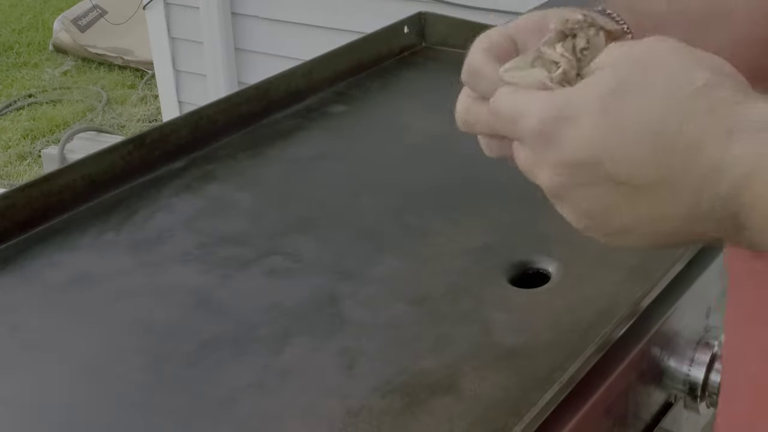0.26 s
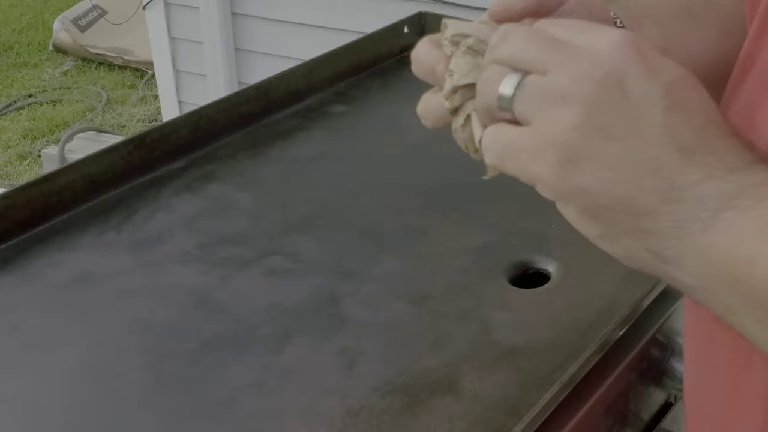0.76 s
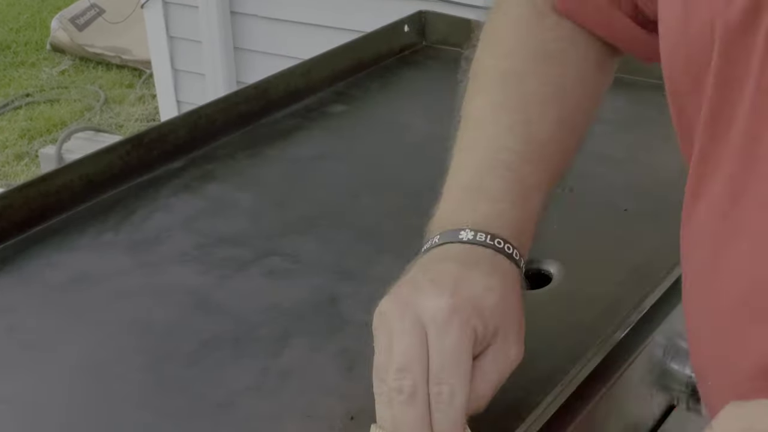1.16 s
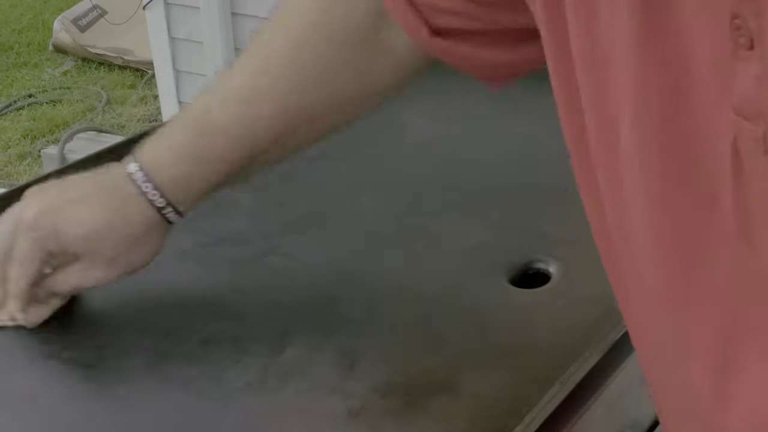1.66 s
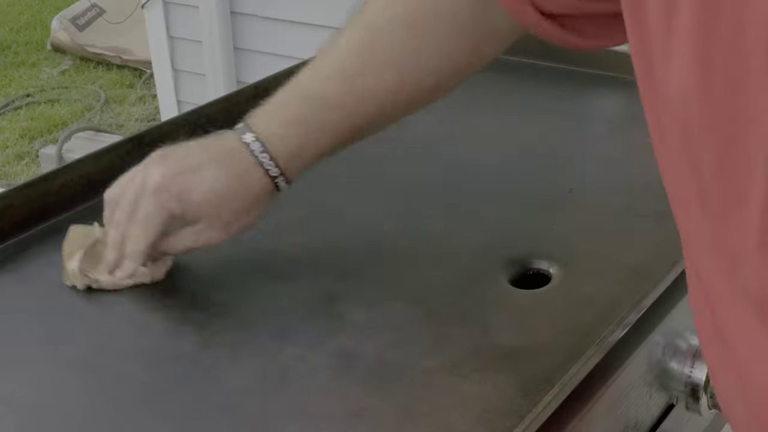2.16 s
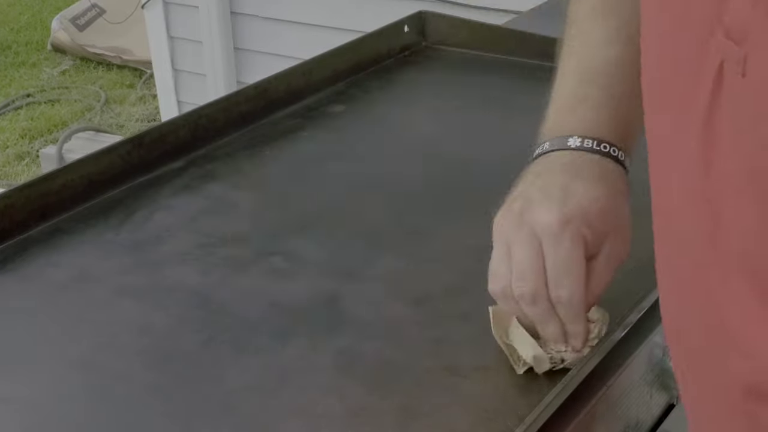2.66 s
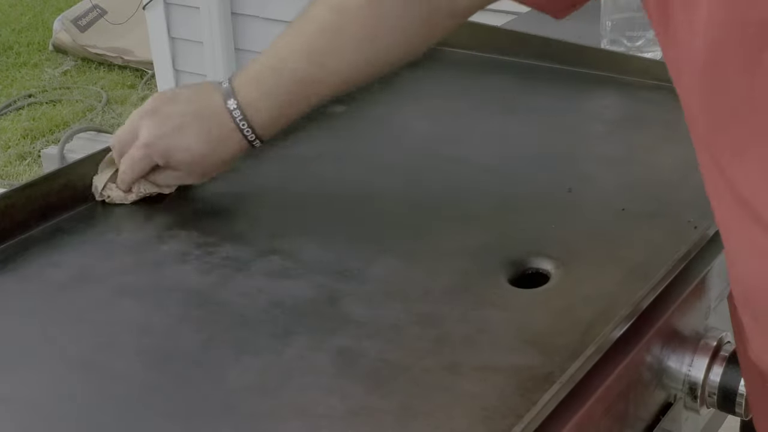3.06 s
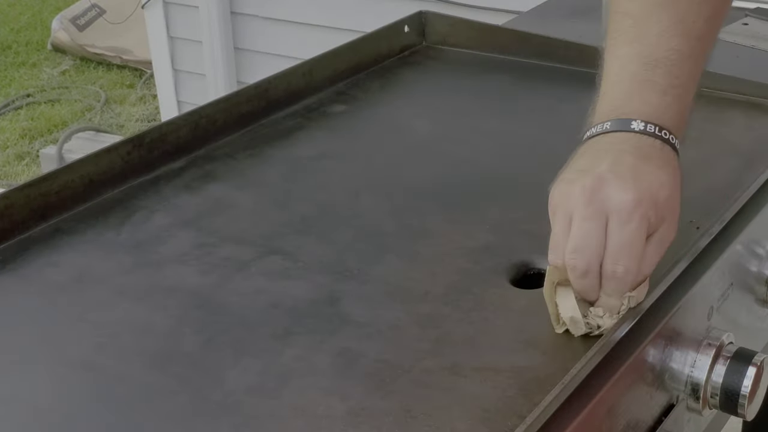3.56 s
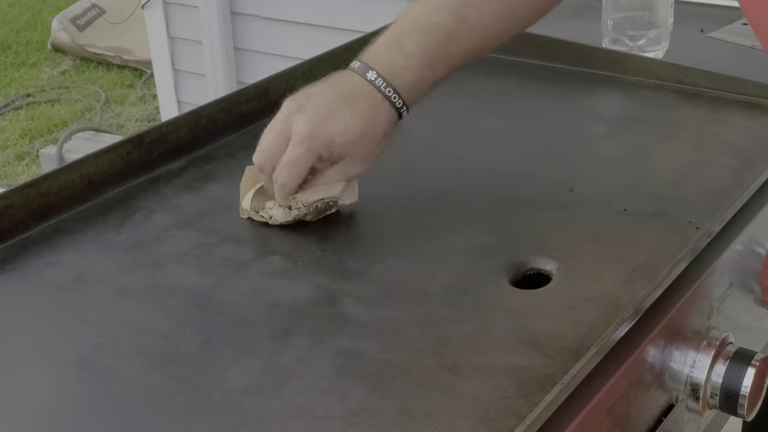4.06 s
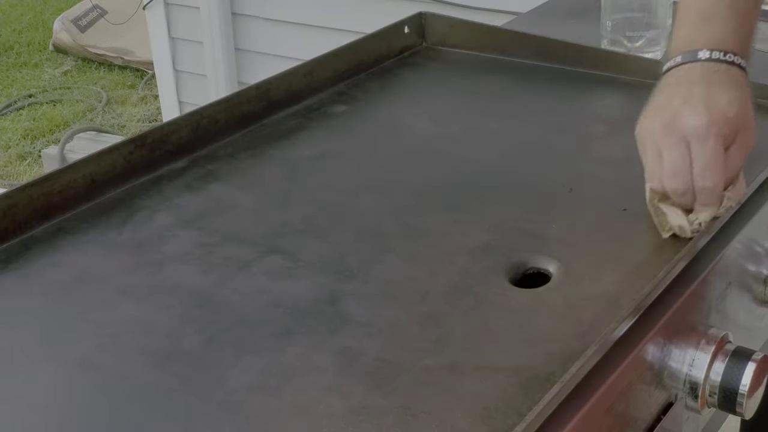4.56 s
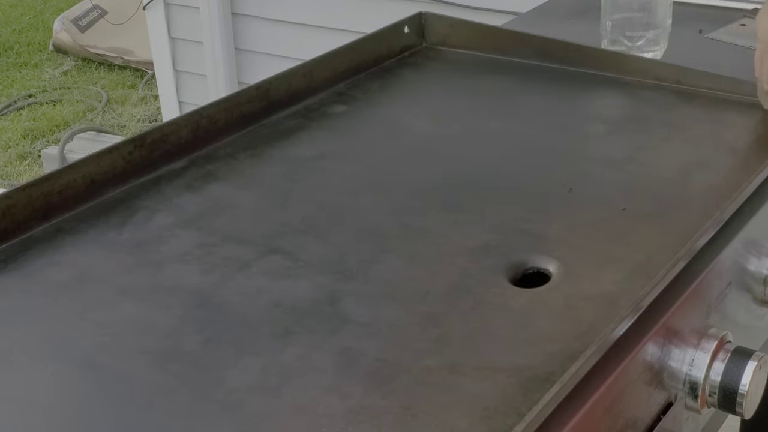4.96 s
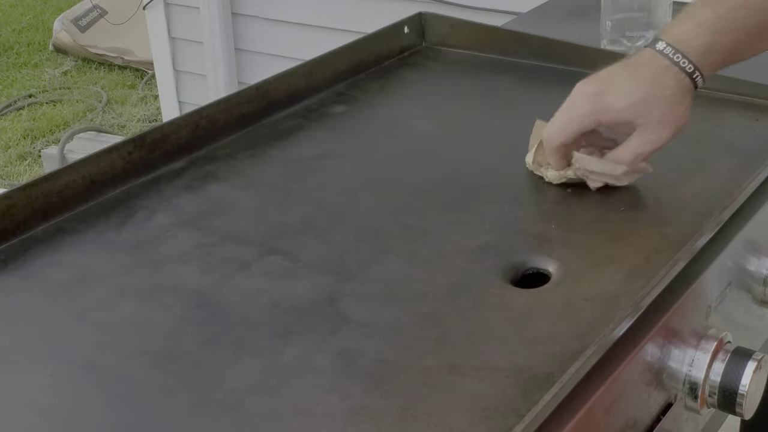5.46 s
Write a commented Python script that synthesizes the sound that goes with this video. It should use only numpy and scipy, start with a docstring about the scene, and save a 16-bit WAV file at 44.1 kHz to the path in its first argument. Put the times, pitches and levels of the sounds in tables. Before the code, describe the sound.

Close microphone, no audible room: paper crackles densely at first, strongest near one second, then turns into repeated hissing rubs on flat steel with small dips between them. Later strokes are a little softer and duller. Near five seconds comes a brief crinkle, a faint pause, then a final short wipe over very quiet outdoor air.

```python
"""A crumpled paper towel is squeezed in two hands outdoors, over quiet air and a low rumble that swells with the hand.
Creases snap (short wavelets, briefly answered by a steel plate) and fibres rub (lumpy noise through wad resonances).
From about 1.3 s the wad is wiped over the steel cooking plate in short strokes, and the rubbing turns to hiss and sheen.
Near 5.1 s it is lifted and slowly unfolds, faintly; one last stroke follows from 5.4 s.
"""
import sys
import numpy as np
from scipy import signal
from scipy.fft import rfft, irfft, next_fast_len
from scipy.io import wavfile
from scipy.ndimage import uniform_filter1d, map_coordinates

SR = 44100
rng = np.random.default_rng(int(sys.argv[2]) if len(sys.argv) > 2 else 0)


def volts(x):
    """Linear amplitude factor 10**(x/20) for a level x in dB, scalar or array-like."""
    e = np.asarray(x, float) / 20
    return 10 ** e


def wav_record(signal):
    """Record a signal, one row per channel, as 16-bit PCM in the file named by sys.argv[1]."""
    frames = np.transpose(np.atleast_2d(signal))
    bounded = np.clip(frames, -1, 1)
    # unit amplitude maps onto the largest positive 16-bit level
    quanta = np.round(bounded * 32767).astype(np.int16)
    wavfile.write(sys.argv[1], SR, quanta)


N = 252252  # samples


def unit(x):
    """Scale to rms 1."""
    return x / np.sqrt(np.mean(x ** 2) + 1e-20)


def coloured(x, points):
    """x through a curve of (Hz, dB) points read on a log axis."""
    size = next_fast_len(N + 8192)
    hz, db = np.transpose(points)
    bins_hz = np.fft.rfftfreq(size, 1 / SR)
    gain = volts(np.interp(np.log(bins_hz + 1), np.log(hz), db))
    return irfft(rfft(x, size) * gain, size)[..., :N]


def wobble(rate):
    """A smooth random curve with rate knots a second, at most 400."""
    knots = rng.standard_normal(int(N * 400 / SR) + 4)
    return map_coordinates(knots, [np.arange(N) * min(rate, 400) / SR])


def hump(f, hz, width_hz, steep):
    """Power of a resonance over frequency, averaging 1 in every frame."""
    p = (1 + ((f * f - hz * hz) / (np.abs(width_hz) * (f + 1))) ** 2) ** -steep
    return p / p.mean(axis=0)


# The working hand, one list per squeeze or stroke. Each row: time in seconds, effort in dB,
# sliding speed in dB, weight on the wad in dB.
STROKES = [
    [(0.0, -78, -22, -11), (0.02, -77, -19, -10), (0.114, -69.5, -32, -26), (0.14, -59, -25, -28),
     (0.15, -64, -24, -8), (0.164, -54.5, -28, -13), (0.218, -70.5, -16, -13), (0.232, -66, -36, -19),
     (0.245, -63, -14, -6)],
    [(0.245, -69, -20, -5), (0.257, -41.5, -23, -28), (0.273, -49, -11.5, -9), (0.419, -45.5, -17, -12),
     (0.487, -44.5, -7.5, -2), (0.585, -61.5, -16, -13), (0.595, -48, -13, -39), (0.605, -66, -14, -17),
     (0.62, -52, -17, -12)],
    [(0.62, -54, -21, -16), (0.646, -40, -17, -5), (0.662, -46, -12, 1.5), (0.718, -44, -13.5, -11),
     (0.786, -40, -15, -8.5), (0.832, -35, -17, -8), (0.874, -42.5, -18, -11.5), (0.908, -39.5, -13, -6.5),
     (0.96, -44, -28, -12.5)],
    [(0.96, -46.5, -29, -9), (0.982, -35, -7, -12.5), (1.014, -41, -19.5, -12), (1.096, -40.5, -29, -10.5),
     (1.17, -41.5, -19, -13.5), (1.196, -49.5, -30, -9.5), (1.258, -34, -12, -36), (1.298, -59, -13, -26),
     (1.33, -55.5, -15, -37)],
    [(1.33, -55, -24, -37), (1.39, -39, -6, -28), (1.448, -34, -2.5, -34), (1.538, -36.5, -3.5, -25.5),
     (1.6, -43, -3.5, -20), (1.616, -38.5, -2.5, -11.5), (1.642, -59, -12, -7.5), (1.708, -68.5, -21, -14),
     (1.715, -70, -28, -13)],
    [(1.715, -73, -25, -11), (1.723, -50.5, -18, -28), (1.751, -46, -13.5, -23), (1.817, -39, -5, -37),
     (1.859, -37, -4, -23), (1.917, -34.5, -2, -42), (2.005, -48, -10, -24), (2.031, -63.5, -13, -32),
     (2.13, -62, -7, -31)],
    [(2.13, -60, -10, -28), (2.152, -47.5, -6.5, -35), (2.212, -35, -3, -43), (2.286, -40, -2, -22),
     (2.342, -39, -4, -20), (2.364, -42.5, -4.5, -18), (2.394, -48, -13, -5.5), (2.438, -56.5, -24, -10),
     (2.475, -53, -21, -14)],
    [(2.475, -52, -29, -12), (2.489, -39.5, -13.5, -18), (2.511, -38, -7.5, -17), (2.607, -41.5, -5, -24.5),
     (2.653, -40.5, -8.5, -44), (2.733, -46, -12.5, -14), (2.783, -53.5, -16, -16.5),
     (2.849, -72.5, -20, -20), (2.865, -62, -17, -29)],
    [(2.865, -66, -19, -19), (2.879, -51, -14.5, -23.5), (2.927, -41.5, -7.5, -24),
     (2.959, -39.5, -4.5, -19), (3.039, -43, -3, -28.5), (3.147, -47.5, -10.5, -21), (3.225, -69, -27, -27),
     (3.253, -59, -24, -43), (3.27, -72, -15, -24)],
    [(3.27, -63, -25, -28), (3.282, -47.5, -14, -37), (3.294, -42, -10, -51), (3.33, -41, -11, -37),
     (3.436, -40.5, -9, -36), (3.496, -41.5, -11.5, -37), (3.57, -50.5, -11, -32), (3.632, -63, -18, -16),
     (3.64, -60, -18, -21)],
    [(3.64, -61, -18, -17), (3.684, -46, -19, -23), (3.694, -50, -20, -14), (3.77, -46, -25, -23),
     (3.8, -50, -23, -11), (3.858, -50.5, -18.5, -20), (3.888, -53.5, -9.5, -17), (3.9, -60, -16, -20)],
    [(3.9, -57, -15, -7), (3.912, -51.5, -22, 3), (3.928, -49.5, -25.5, -5.5), (4.004, -42, -13.5, -20.5),
     (4.084, -59.5, -11.5, -20), (4.12, -49.5, -12, -19), (4.142, -45.5, -13, -18), (4.174, -62, -19, -11),
     (4.22, -65, -22, -16)],
    [(4.22, -62, -17, -21), (4.244, -48.5, -16, -25), (4.3, -39.5, -12.5, -33), (4.426, -40, -14, -26),
     (4.48, -44, -14, -29), (4.498, -40, -16.5, -28), (4.52, -45.5, -15.5, -26), (4.592, -47, -14, -16),
     (4.6, -46, -21.5, -31)],
    [(4.6, -47, -16, -28), (4.618, -48.5, -17, -32), (4.666, -51, -14.5, -26), (4.74, -51, -16.5, -27),
     (4.792, -49.5, -18.5, -41), (4.828, -52.5, -16.5, -21), (4.866, -51, -14, -27),
     (4.928, -59.5, -16, -21), (4.98, -53, -18, -29)],
    [(4.98, -54, -17, -23), (5.048, -45.5, -19, -15.5), (5.058, -44.5, -11.5, -30),
     (5.07, -51.5, -19.5, -11.5), (5.08, -55, -22, -13), (5.09, -66, -11, -7)],
    [(5.43, -69.5, -11, -22), (5.454, -72, -21, -19), (5.478, -60, -19, -22), (5.51, -62, -17, -16),
     (5.538, -45.5, -17, -25), (5.58, -43, -20.5, -22.5), (5.68, -42, -15.5, -24), (5.72, -50.5, -22, -23)],
]
# The lifted wad slowly unfolds in the air. Each row: time in seconds, effort in dB, sliding speed in dB, weight in dB.
LIFTED = [(5.11, -65.5, -15, -22), (5.17, -70.5, -16.5, -21), (5.25, -86, -17, -22),
          (5.33, -83.5, -17.5, -19), (5.38, -73, -12.5, -22), (5.42, -74, -19, -26)]


def hand(t):
    """Effort, speed and weight of the hand at times t (dB), gliding from row to row."""
    rows = np.vstack([*STROKES, LIFTED])
    s, *controls = rows[np.argsort(rows[:, 0], kind="stable")].T
    return [np.interp(t, s, control) for control in controls]


# How much the wad is crumpled rather than slid. Each row: time in seconds, share from 0 to 1.
CRUMPLING = [(0, 0), (0.5, 1), (0.8, 0.69), (1.02, 0), (1.08, 0), (1.2, 0.2), (1.3, 0.6), (1.38, 0),
             (3.55, 0.14), (3.7, 0), (4.2, 0), (4.9, 0), (5.0, 0.3), (5.08, 0.55), (5.15, 0), (5.5, 0)]


def crumpling_at(t):
    """Share of crumpling at times t: it makes the rubbing lumpier and the small snaps louder."""
    return np.interp(t, *np.transpose(CRUMPLING))


# Tone of the low rumble. Each row: frequency in Hz, relative level in dB.
RUMBLE_COLOUR = [(15, -41.5), (30, -16), (80, -2.5), (170, -7.5), (300, -15), (600, -45.5)]
# Slow rise and fall of the low rumble. Each row: time in seconds, change in dB.
RUMBLE_SWELL = [(0, 2), (.6, -5), (1.2, 2), (1.8, -1), (2.4, 2), (3, 2.5), (3.5, 3), (4, 6), (4.6, 1),
                (5.2, 2), (5.72, 2)]


def rumble():
    """The hand presses a lumpy low rumble into the plate: deep noise that follows effort and weight, slowly swelling."""
    t = np.arange(N) / SR
    effort_db, _, weight_db = hand(t)
    push_db = 0.39 * (effort_db + 46.5) + 0.061 * (weight_db + 12)
    swell_db = np.interp(t, *np.transpose(RUMBLE_SWELL))
    lumps_db = 1.1 * wobble(8.1) + 2.2 * wobble(3.3)
    level = volts(-75.5 + push_db + swell_db + lumps_db)
    return level * unit(coloured(rng.standard_normal(N), RUMBLE_COLOUR))


# Tone of quiet outdoor air. Each row: frequency in Hz, relative level in dB.
AIR_COLOUR = [(120, -40.5), (200, 3), (1130, -4.5), (1280, -14), (4590, -7), (5500, -7.5), (5900, -1),
              (6400, -3), (10600, -9.5), (15600, -11.5)]


def air():
    """Quiet outdoor air: steady coloured noise."""
    return volts(-82) * unit(coloured(rng.standard_normal(N), AIR_COLOUR))


def plate(x):
    """The steel plate and its rim return a short, dense answer: noise dying by 60 dB in 29 ms."""
    t = np.arange(SR // 10) / SR
    tail = rng.standard_normal(len(t)) * volts(-60 * t / 0.029)
    late = np.pad(x, (60, 0))  # samples, about 1.4 ms
    return signal.fftconvolve(late, tail / np.linalg.norm(tail))[:N]


def wavelets(s, db, hz, cycles):
    """Short bursts of a few cycles with a quick rise and a slower fall, thin below their pitch."""
    k = np.arange(-64, 192)  # samples around each burst
    u = k / SR * (hz / cycles)[:, None]
    shape = np.exp(-np.where(u < 0, 5.5, 2.5) * u * u)
    phase = rng.uniform(-1, 1, (len(s), 1))
    w = volts(db)[:, None] * shape * np.cos(2 * np.pi * hz[:, None] * k / SR + phase)
    # a crease radiates little under 0.44 of its pitch
    over = 1j * np.fft.rfftfreq(len(k), 1 / SR) / (0.44 * hz[:, None])
    low_cut = over ** 2 / (1 + np.sqrt(2) * over + over ** 2)
    w = irfft(rfft(w) * low_cut, len(k))
    at = np.clip(np.round(s * SR).astype(int)[:, None] + k, 0, N - 1)
    return np.bincount(at.ravel(), w.ravel(), N)


# Loud crease snaps. Each row: time in seconds, level in dB before the filters, pitch in Hz.
SNAPS = [(0.133, -32, 3350), (0.1393, -20.5, 3930), (0.1637, -45, 2910), (0.178, -44, 2380),
         (0.2348, -42, 1830), (0.254, -29, 1810), (0.26, -39, 1520), (0.272, -27.5, 1170),
         (0.3094, -24, 1660), (0.3274, -41, 4060), (0.3794, -24, 8670), (0.3993, -18.5, 2400),
         (0.451, -48, 2710), (0.4793, -37, 1700), (0.495, -21, 1370), (0.549, -34, 3080),
         (0.6323, -28, 1500), (0.5942, -26.5, 5200), (0.6475, -21.5, 2300), (0.6756, -22.5, 1420),
         (0.679, -23.5, 3010), (0.708, -20.5, 1370), (0.7335, -18.5, 4200), (0.7685, -23.5, 9350),
         (0.772, -19, 8800), (0.804, -30.5, 2200), (0.8162, -15.5, 2290), (0.8338, -20, 700),
         (0.846, -28.5, 2800), (0.86, -23, 3120), (0.9153, -21, 11000), (0.9152, -17, 2190),
         (0.9824, -29, 1920), (0.988, -32, 1600), (1.0376, -20, 8700), (1.192, -27, 1980),
         (1.235, -23, 9000), (1.26, -38, 3610), (1.3105, -33.5, 8030), (1.346, -42, 7680),
         (1.614, -16.5, 4870), (1.6161, -20, 2430), (1.6306, -31, 5650), (1.7241, -28, 4970),
         (1.732, -28, 1200), (1.993, -29, 1750), (2.148, -30, 8620), (2.4914, -21, 5900),
         (2.9599, -19, 2960), (3.008, -28, 8200), (3.1824, -33.5, 2360), (3.2502, -36, 6800),
         (3.6832, -30, 2400), (3.9117, -24.5, 1130), (4.1176, -25, 4470), (4.1838, -39, 2380),
         (4.2956, -19.5, 3500), (4.4299, -17.5, 2900), (4.492, -21, 2600), (4.497, -22, 2440),
         (4.5976, -22, 3550), (4.9992, -29, 3120), (5.015, -40, 4700), (5.0178, -28, 3510),
         (5.0433, -20.5, 2870), (5.0572, -24, 6500), (5.079, -28, 3160), (5.415, -25, 4000),
         (5.4216, -42, 3100)]


def crinkle():
    """Creases buckle: loud snaps, and many small ones that follow the effort and grow with crumpling."""
    s, db, hz = np.transpose(SNAPS)
    loud = wavelets(s, db, hz, cycles=0.94 * (hz / 2500) ** 0.82)
    when, strength, pitch, length = rng.random((1500, 4)).T
    small_s = when * N / SR
    effort_db = hand(small_s)[0] + 9.9 * crumpling_at(small_s)
    small_db = effort_db - 7 - 5.3 * np.log(strength + 0.16)  # a few stand out
    small_hz = 1100 * 5.0 ** pitch
    small_cycles = (2.15 + 0.31 * length) * (small_hz / 2500) ** 0.09
    small = wavelets(small_s, small_db, small_hz, small_cycles)
    # a thin sheet radiates no bass
    sheet = [(60, -42.5), (300, -14.5), (600, 0.5), (1500, -3.0), (3000, -3), (20000, -2.5)]
    return coloured(loud + small, sheet)


def avalanches(boost_db, life_s):
    """Every loud snap frees the neighbouring folds: a swell in dB that dies away after it."""
    at = np.round(np.transpose(SNAPS)[0] * SR).astype(int)
    starts = np.bincount(at, minlength=N)[:N]
    t = np.arange(SR // 20) / SR
    swell = signal.fftconvolve(starts, np.exp(-t / life_s))[:N]
    return boost_db * np.tanh(swell)


# A loose fold catches and drags for a moment. Each row: time of its middle in seconds, length in seconds,
# level in dB, centre in Hz.
SCUFFS = [(.26, 0.01, -39.5, 1370), (0.836, .012, -44, 498), (0.313, 0.028, -38.5, 1580),
          (0.486, 0.017, -41.5, 1300), (0.989, 0.018, -36, 1870), (1.26, 0.025, -47, 1580),
          (1.618, 0.018, -46.5, 2180), (1.73, .012, -50, 1210), (2.388, 0.038, -50.5, 1670),
          (2.49, .015, -55, 1500), (2.953, 0.012, -36, 1900), (3.17, 0.0091, -47, 1350),
          (3.323, 0.037, -48.5, 1020), (3.921, 0.014, -48, 900), (5.035, .04, -52.5, 1470)]


def scuffs(f, t):
    """Power over frequency and time of the dragging folds, each a resonance that swells and fades."""
    power = 0
    for s, length, db, hz in SCUFFS:
        swell = np.exp(-4 * ((t - s) / length) ** 2)
        power = power + volts(2 * db) * hump(f, hz, 0.49 * hz, steep=1.65) * swell
    return power


def slips(spiky_db, clumpy_db, crumpled_db):
    """White stick-slip of many fibres: uneven grain sizes in clumps, far lumpier while the wad is crumpled."""
    crumpling = crumpling_at(np.arange(N) / SR)
    depth_db = clumpy_db + crumpled_db * crumpling
    # deeper clumps keep the same power
    clumps_db = depth_db * wobble(390) - depth_db ** 2 * np.log(10) / 20
    bursts_db = (0.5 + 2.2 * crumpling) * wobble(30)
    freed_db = crumpling * (avalanches(boost_db=6.0, life_s=0.003) - 3.0)
    grains_db = spiky_db * rng.standard_normal(N) + clumps_db + bursts_db + freed_db
    return unit(volts(grains_db) * rng.standard_normal(N))


# The grip reshapes the wad as it travels. Each row: time in seconds, body centre in Hz, hiss centre in Hz,
# sheen centre in Hz.
GRIP = [(0.0, 1960, 6670, 10400), (0.13, 2650, 6000, 10300), (0.21, 1600, 6430, 9520),
        (0.24, 1420, 8450, 9630), (0.38, 1700, 8500, 10300), (0.52, 1550, 8610, 10200),
        (0.57, 2110, 6400, 9670), (0.62, 1460, 7560, 9970), (0.83, 1860, 8760, 10300),
        (1.18, 2040, 7180, 9730), (1.27, 1520, 7750, 9670), (1.37, 1950, 7900, 9700),
        (1.54, 1280, 7430, 10600), (1.62, 2390, 6530, 10900), (1.7, 1490, 6280, 10300),
        (1.75, 1590, 6920, 11500), (2.09, 1640, 8150, 9800), (2.53, 1930, 7000, 11700),
        (2.74, 1770, 8060, 9700), (3.03, 1870, 7990, 11000), (3.06, 1530, 7430, 11800),
        (3.18, 1840, 6740, 10500), (3.3, 1880, 7300, 9500), (3.38, 1500, 7400, 10100),
        (3.43, 2030, 8290, 10100), (3.51, 1890, 7700, 10800), (3.68, 2060, 8310, 9570),
        (3.74, 1700, 8610, 9730), (4.0, 1570, 6130, 10400), (4.22, 1700, 8520, 9580),
        (4.46, 1900, 6600, 10700), (4.92, 1950, 7030, 10200), (5.13, 2140, 6540, 9590),
        (5.21, 1850, 6090, 11000), (5.3, 1900, 7490, 11700), (5.37, 2410, 5960, 11200),
        (5.45, 2450, 6060, 10200), (5.5, 1710, 7530, 9520), (5.54, 1890, 8000, 9700),
        (5.72, 1770, 6900, 9830)]


def rubbing():
    """Fibre slips ring the wad's resonances: speed shifts the sound to hiss and sheen, weight feeds the low one."""
    grains = slips(spiky_db=2.5, clumpy_db=1.2, crumpled_db=2.6)
    f, t, z = signal.stft(grains, SR, nperseg=256)
    f = f[:, None]
    effort_db, speed_db, weight_db = hand(t)
    crumpling = crumpling_at(t)
    s, *centres_hz = np.transpose(GRIP)
    body_hz, hiss_hz, sheen_hz = [np.interp(t, s, hz) for hz in centres_hz]

    def share(db, per_speed, per_effort, crumpled_db):
        """Power weight of a resonance: dB at a middling slide, growth in dB per dB, change when crumpled."""
        slide_db = per_speed * (speed_db + 14) + per_effort * (effort_db + 48)
        return volts(2 * (db + slide_db + crumpled_db * crumpling))

    body = share(-5, -0.55, -0.034, crumpled_db=14.5)
    scrape = share(-4.5, -0.13, -0.038, crumpled_db=-3.5)
    hiss = share(-3.5, 0.29, 0.03, crumpled_db=7)
    sheen = share(-13.5, 1.22, -0.03, crumpled_db=0)
    power = body * hump(f, body_hz, width_hz=3930, steep=3.12)
    power = power + scrape * hump(f, 4460, width_hz=3800, steep=3.8)
    power = power + hiss * hump(f, hiss_hz, width_hz=5400, steep=4.23)
    power = power + sheen * hump(f, sheen_hz, width_hz=4200, steep=1.7)
    power = power / (body + scrape + hiss + sheen)
    # the pressing resonance sinks and weakens while the wad is crumpled
    pressing = volts(2 * (weight_db + 3.5 - 3.5 * crumpling))
    power = power + pressing * hump(f, 600 - 146 * crumpling, width_hz=990, steep=1.12)
    power = power * volts(2 * effort_db) + scuffs(f, t)
    # the contact patch keeps changing shape, so the colour is blotchy
    patches = uniform_filter1d(rng.standard_normal(z.shape), size=4, axis=0)
    patches = unit(uniform_filter1d(patches, size=30, axis=1))
    return signal.istft(z * np.sqrt(power) * volts(1.7 * patches), SR, nperseg=256)[1][:N]


def scene():
    """Air and rumble, the snaps with the plate's answer, and the rubbing in front."""
    snaps = crinkle()
    answer = volts(-23.0) * plate(snaps)
    return (air() + rumble() + answer + snaps + rubbing())[None]


# Narrow resonances of the microphone housing. Each row: centre in Hz, width in Hz, gain in dB.
HOUSING = [(4750, 250, -1), (6020, 390, 2.5), (8770, 170, -1.5), (10650, 770, -1)]


def housing(x):
    """The microphone housing lifts or dips narrow bands."""
    hz = np.arange(50, SR / 2, 50)
    ridges_db = sum(db * np.exp(-2 * ((hz - centre) / width) ** 2) for centre, width, db in HOUSING)
    return coloured(x, np.c_[hz, ridges_db])


def band_limit(x):
    """A steep low-pass at the top of the band."""
    return signal.sosfilt(signal.butter(12, 15710, fs=SR, output="sos"), x)


# Microphone colour. Each row: frequency in Hz, gain in dB.
MICROPHONE = [(100, -2), (3000, -1), (6000, -2), (9000, -0.5), (13000, 0.5), (15700, -1.5)]


def record(dry):
    """The scene through the housing resonances and the microphone colour."""
    mix = coloured(housing(dry), MICROPHONE)
    return band_limit(mix)


dry = scene()
out = record(dry)
wav_record(out)
```